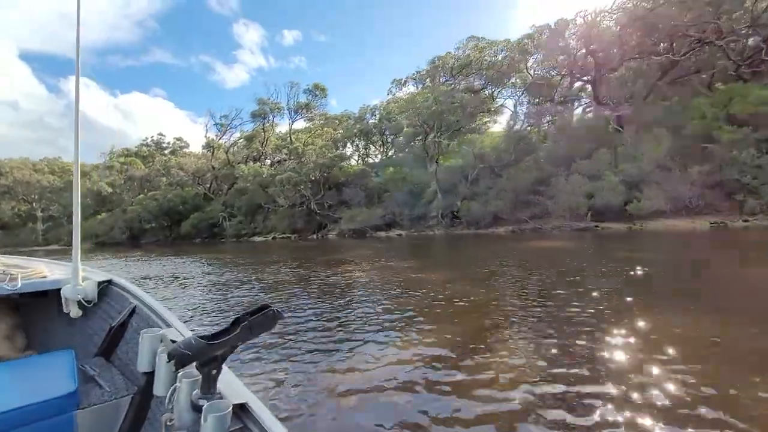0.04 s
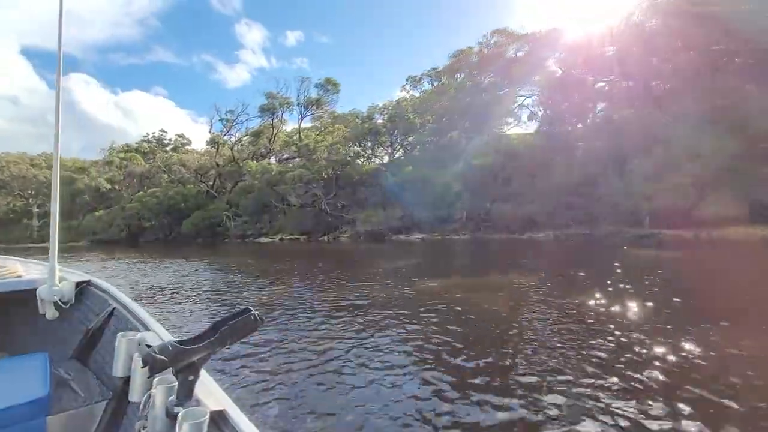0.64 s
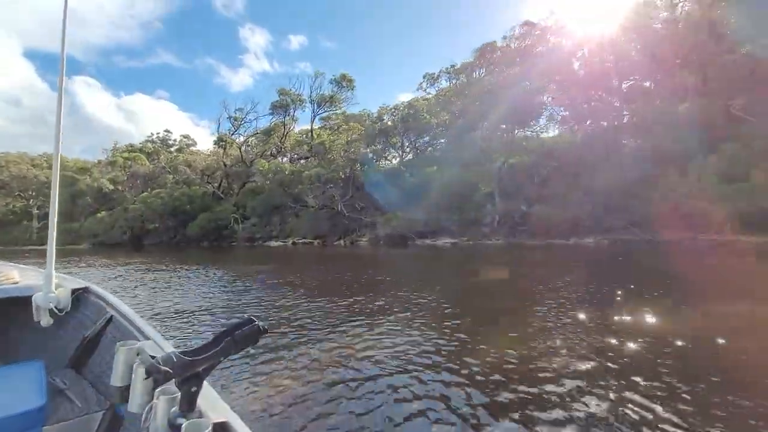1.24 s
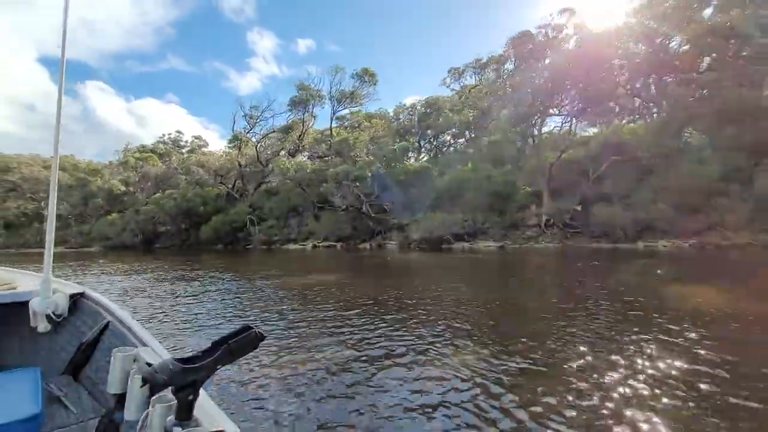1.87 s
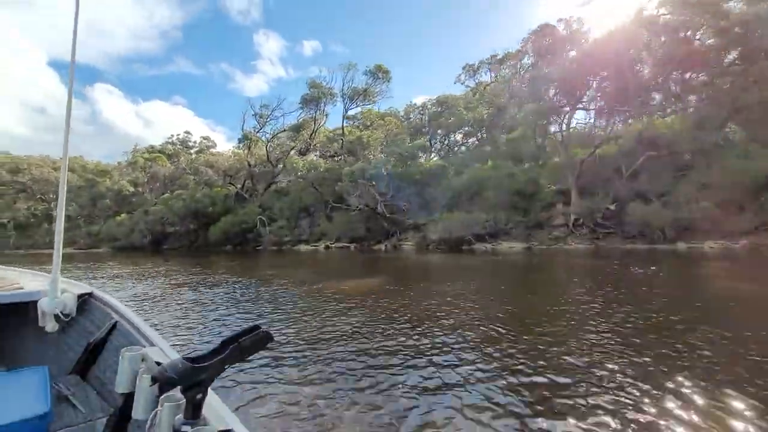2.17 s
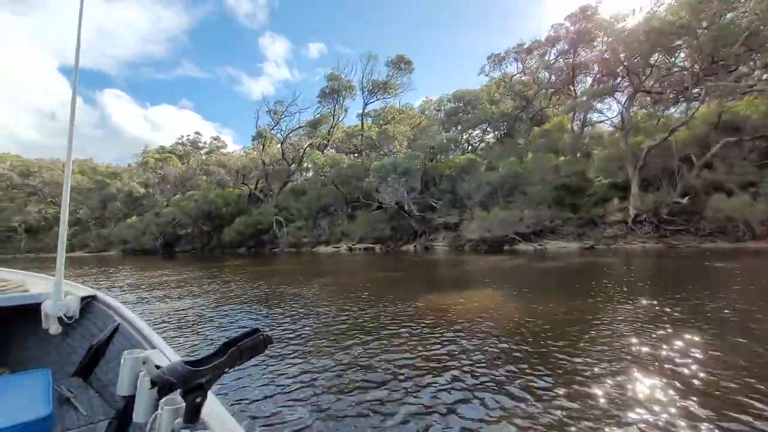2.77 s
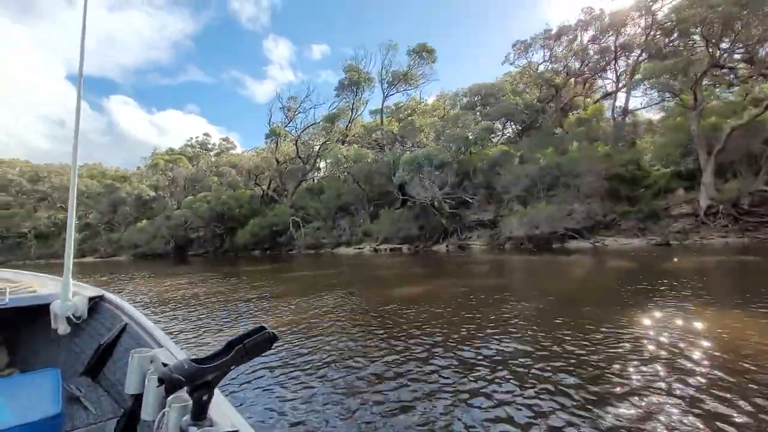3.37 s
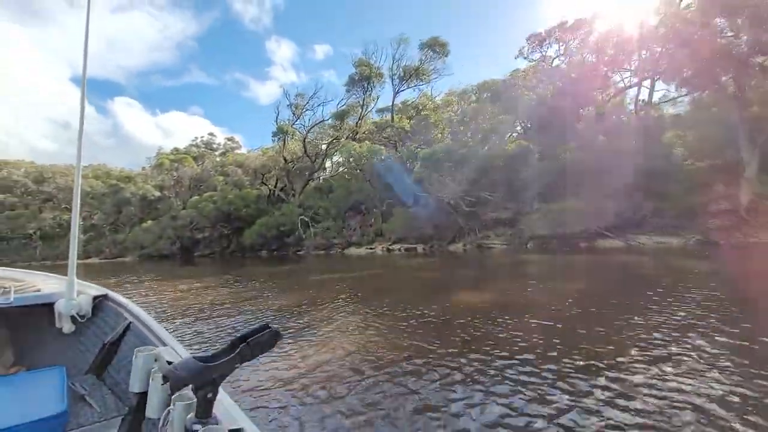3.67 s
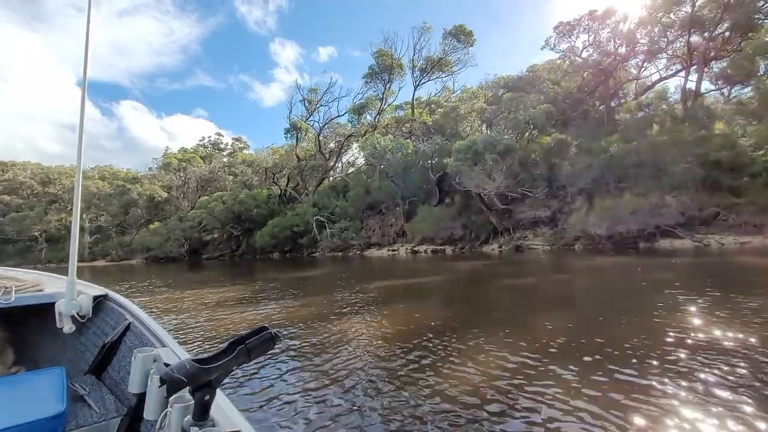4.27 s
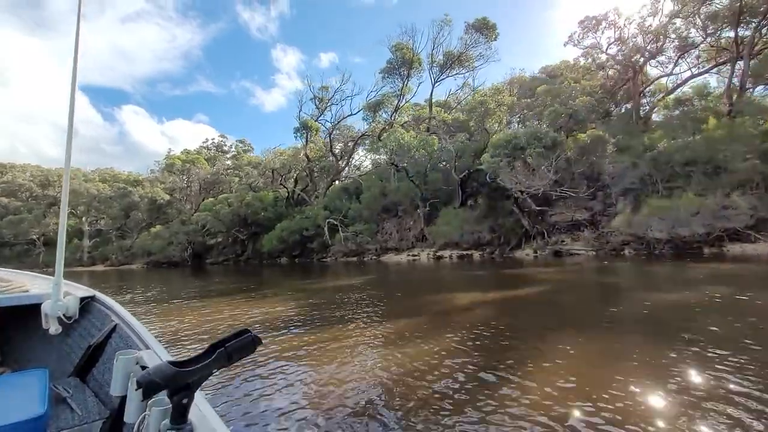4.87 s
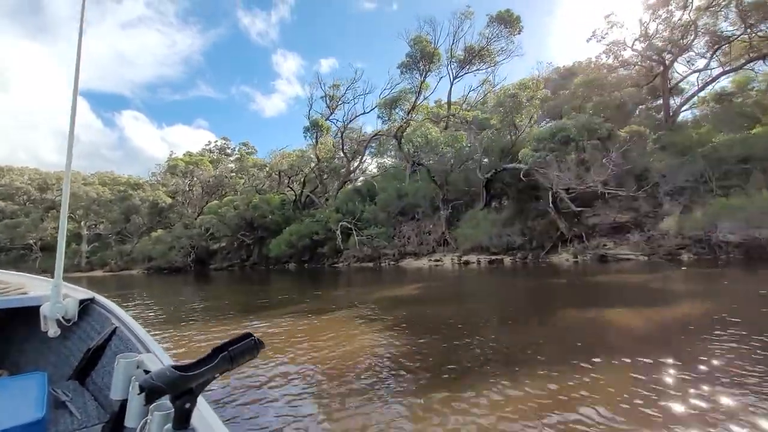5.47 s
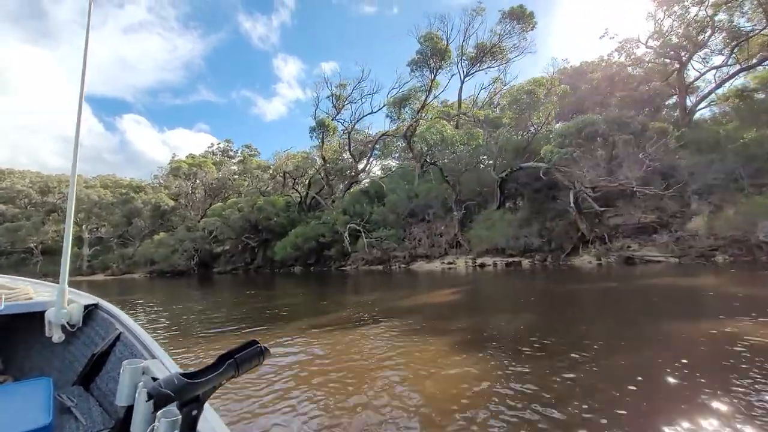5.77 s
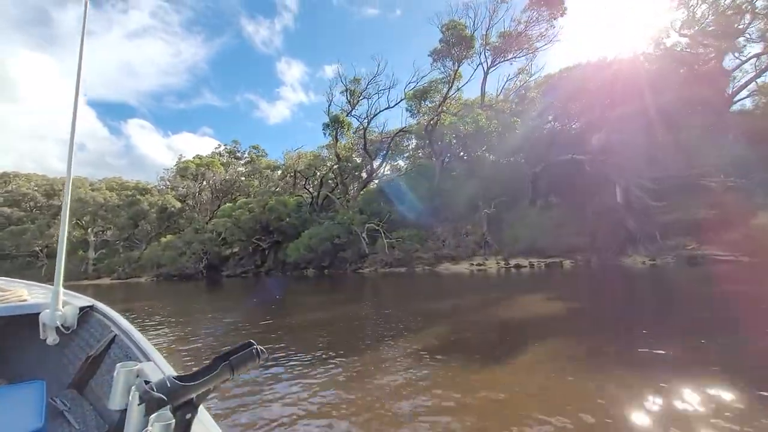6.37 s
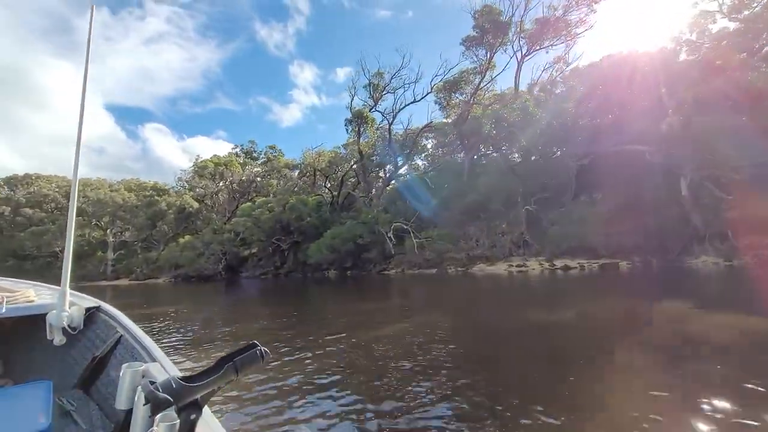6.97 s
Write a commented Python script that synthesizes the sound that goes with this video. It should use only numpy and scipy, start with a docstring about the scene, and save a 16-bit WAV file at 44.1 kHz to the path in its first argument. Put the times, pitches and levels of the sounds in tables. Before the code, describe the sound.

Gusty wind thumps the microphone over the hum and rattle of a small boat's outboard motor, which gradually eases off.

```python
"""A small outboard motor pushes a metal dinghy along a river, slowly easing off.
Its firing pulses boom in the hull and rattle the cowling, to the right, where a bearing whines too.
Water washes along the hull and the wake hisses. A head wind rumbles, gusts and thumps
on the microphone, mostly at its left port."""
import sys
import numpy as np
from scipy import signal
from scipy.fft import rfft, irfft, next_fast_len
from scipy.io import wavfile
from scipy.ndimage import uniform_filter1d

SR = 44100
rng = np.random.default_rng(int(sys.argv[2]) if len(sys.argv) > 2 else 0)


def generate_wav(sig):
    """Save sig (samples, or channels by samples) to the path in sys.argv[1] as 16-bit PCM at SR."""
    pcm = np.round(np.clip(np.atleast_2d(sig).T, -1, 1) * 32767).astype(np.int16)
    wavfile.write(sys.argv[1], SR, pcm)


N = 309582
TIME = np.arange(N) / SR


def amp(db):
    """Decibels to gain."""
    return 10 ** (np.asarray(db) / 20)


def unit(x):
    """Scales to rms 1."""
    return x / np.sqrt(np.mean(x ** 2) + 1e-20)


def levelled(x, size):
    """Holds the rms near 1 over spans of size samples."""
    return x / np.sqrt(abs(uniform_filter1d(uniform_filter1d(x ** 2, size), size)) + 1e-12)


def curves(rows):
    """A table's columns as automation lanes, with straight ramps."""
    times_s, *columns = np.transpose(rows)
    return [np.interp(TIME, times_s, column) for column in columns]


def filtered(x, gain):
    """Filters x by a gain that is a function of frequency."""
    size = next_fast_len(len(x))
    return irfft(rfft(x, size) * gain(np.fft.rfftfreq(size, 1 / SR) + 1e-3), size)[:len(x)]


def highpass(x, edge_hz):
    """The part of x above a soft edge."""
    return filtered(x, lambda f: 1 / (1 + (edge_hz / f) ** 4))


def noise(spectrum, channel):
    """Noise coloured by a spectrum's left (0) or right (1) column, in dB per Hz."""
    hz, *db = np.transpose(spectrum)
    white = rng.standard_normal(N) * np.sqrt(SR / 2)
    return filtered(white, lambda f: amp(np.interp(np.log(f), np.log(hz), db[channel])))


def wander(rate_hz):
    """Random drift of rms 1, rolling off above the rate."""
    return unit(filtered(rng.standard_normal(N), lambda f: np.exp(-(f / rate_hz) ** 2)))


def partial(angle):
    """A sine that follows the angle from a random starting phase."""
    return np.cos(angle + rng.uniform(0, 2 * np.pi))


# The throttle easing off: time_s, shaft_speed_hz
SHAFT_SPEED = [(0, 62.65), (.8, 62.4), (1.5, 61.8), (1.8, 61.15), (2.05, 60.2), (2.3, 58.85), (2.9, 56.95),
               (3.2, 56.8), (3.8, 55.5), (4.1, 56.05), (4.4, 55.5), (5.3, 55.15), (5.55, 54.75),
               (5.8, 53.4), (6.55, 52.35), (7.02, 52.8)]


def shaft(hunting=0.002106, jitter_rad=0.017):
    """Crank angle: the speed hunts a little and no two turns are alike."""
    speed_hz = curves(SHAFT_SPEED)[0] * (1 + hunting * wander(6.96))
    return 2 * np.pi * np.cumsum(speed_hz) / SR + jitter_rad * wander(37)


# The orders that shake the hull hardest: shaft_multiple
BOOMING_ORDERS = (2, 3, 4, 6)
# The hull's resonance; a booming order swells as it slides over a peak: pitch_hz, level_db
HULL_RESPONSE = [(104, -26), (111, -21.5), (113.5, -18), (118, -26), (125, -26), (158, -22), (166, -33),
                 (175, -41), (188, -29), (209, -32), (220, -19), (223, -25.5), (231, -20.5), (249, -39),
                 (316, -31.5), (331, -39.5), (345, -29), (360, -31), (376, -25.5)]
# The steadier orders, shifting as the shaft slows: shaft_multiple, level_db, growth_db_per_hz
STEADY_ORDERS = [(1, -36, -1), (5, -37.5, 0.26), (7, -41, 0.64), (8, -41.5, 1.88), (9, -53, 0.9),
                 (10, -56, -3), (12, -46.5, 0.76), (14, -49, -0.8), (15, -51, 1.4)]


def hull_drone(angle, sway_db=0.94, steady_trim_db=-1, waver_db=2.5, left_db=-0.1, left_lag_rad=0.045):
    """Firing pulses sound the hull at whole multiples of the shaft speed."""
    speed_hz, = curves(SHAFT_SPEED)
    slowing_hz = speed_hz.mean() - speed_hz
    hull_hz, hull_db = np.transpose(sorted(HULL_RESPONSE))
    booming = [(k, np.interp(k * speed_hz, hull_hz, hull_db) + sway_db * wander(4.4))
               for k in BOOMING_ORDERS]
    steady = [(k, db + steady_trim_db + growth * slowing_hz + waver_db * wander(1.9))
              for k, db, growth in STEADY_ORDERS]
    port_angle = angle - np.array([[left_lag_rad], [0]])
    drone = np.zeros((2, N))
    for k, db in booming + steady:
        # the firing orders peak together, once for each cylinder
        phase = 0 if k in (2, 4) else rng.uniform(0, 2 * np.pi)
        drone += amp(db + .7 * wander(9)) * np.sqrt(2) * np.cos(k * port_angle + phase)
    uneven_firing = 1 + .06 * wander(50)
    return drone * uneven_firing * amp([[left_db], [0]])


# The ring of the motor's cover: pitch_hz, width_hz, level_db
COWLING_MODES = [(790, 360, -9.5), (1195, 36, -2), (1348, 69, 4), (1501, 60, 3.5), (1896, 50, 2.5),
                 (2000, 69, -18), (2700, 410, -9.5)]


def cowling(drive):
    """The cover's panels ring as resonators of alternating polarity."""
    def response(f):
        return sum((-1) ** k * amp(db) / (1 + 1j * (f * f - hz * hz) / (f * width))
                   for k, (hz, width, db) in enumerate(COWLING_MODES))
    return unit(filtered(drive, response))


# The bearing's whine: ball_pass_multiple, level_db
WHINE_PARTIALS = [(7, -4), (8, 0), (11, -7)]


def bearing(angle, passes_per_turn=3.1, slip_rad=0.09):
    """Rolling balls pass and slip slightly: a whine between the motor's orders."""
    ball_angle = passes_per_turn * angle + slip_rad * wander(14)
    return unit(sum(amp(db + 2 * wander(11)) * partial(k * ball_angle) for k, db in WHINE_PARTIALS))


# How hard the rattle and the wake run: time_s, clatter_db (before the cowling's trim), wake_db (only its swings
# count)
CLATTER_AND_WAKE_LEVELS = [(0, -34, -42), (0.5, -33, -42), (1.05, -34.5, -43.5), (1.9, -34.5, -43.5),
                           (2.3, -33, -42), (2.9, -34.5, -42), (3.6, -33, -42.5), (4.3, -32.5, -42.5),
                           (5.1, -29, -40), (5.6, -30.5, -40.5), (6.0, -29, -41), (7.02, -29, -40)]


def clatter(angle, trim_db=4, knock_db=-1, whine_db=-6, left_db=-12, scatter_db=-9,
            left_lag_s=0.00022, bright_hz=2300):
    """Regular knocks and a puff of rattle at each firing ring the cowling; the bearing sings through."""
    # two cylinders: the even orders are the stronger
    knocks = unit(sum((.5 if k % 2 else 1) * partial(k * angle) for k in range(17, 42)))
    # two uneven puffs a turn
    stroke = np.exp(.47 * np.cos(2 * angle) + .16 * np.cos(angle) + .5 * np.tanh(wander(43)))
    rattle, scattered = (cowling(stroke * rng.standard_normal(N)) for _ in range(2))
    right = rattle + amp(knock_db) * cowling(knocks) + amp(whine_db) * bearing(angle)
    right = levelled(right, size=16000)
    left = amp(left_db) * np.interp(TIME - left_lag_s, TIME, right) + amp(scatter_db) * scattered
    force_db = curves(CLATTER_AND_WAKE_LEVELS)[0]
    top_gain = amp(force_db - force_db.mean() - 6)  # a harder rattle is also a brighter one
    ports = []
    for side in (left, right):
        softened = side - highpass(side, 2 * bright_hz)
        top = highpass(softened, bright_hz)
        ports.append(softened - top + top * top_gain)
    return np.array(ports) * amp(force_db + trim_db)


# The colour of wash and spray: frequency_hz, left_db_per_hz, right_db_per_hz
WAKE_SPECTRUM = [(100, -58.5, -48.5), (384, -66, -55), (590, -65, -64.5), (1010, -64, -63.5),
                 (1520, -72, -62), (2360, -75.5, -69), (3000, -79, -74), (4400, -78, -78),
                 (5970, -84.5, -78.5), (7370, -84.5, -81), (8560, -89, -92), (9650, -90, -82),
                 (11700, -88, -84.5), (14000, -89.5, -94.5), (15800, -88, -94)]


def wake(left_follow=1, right_follow=2, fizz_db=0.96, lapping_db=0.33, split_hz=2500):
    """Water washes along the hull and breaks into fine spray, which swells mostly on the right."""
    ride_db = curves(CLATTER_AND_WAKE_LEVELS)[1]
    swell_db = ride_db - ride_db.mean()
    splash_db = .4 * wander(7)
    ports = []
    for channel, follow in enumerate((left_follow, right_follow)):
        water = noise(WAKE_SPECTRUM, channel)
        top = highpass(water, split_hz)
        wash = (water - top) * amp(.5 * follow * swell_db + lapping_db * wander(20))
        spray = top * amp(follow * swell_db + splash_db + fizz_db * wander(190))
        ports.append(wash + spray)
    return np.array(ports)


# The bed of head wind between gusts: time_s, level_db
BREEZE_RIDE = [(0, -20), (.8, -13.5), (1.05, -18.5), (2.9, -19), (3.5, -18), (4.2, -25.5), (4.7, -27),
               (5.0, -21.5), (5.6, -27.5), (6.35, -33), (6.65, -23), (7.02, -20.5)]
# Single gusts and the port each hits: peak_s, length_s, level_db, side
GUST_CUES = [(0.185, 0.25, -14, "left"), (0.357, 0.26, -17.5, "left"), (.45, 0.11, -18, "right"),
             (0.716, 0.16, -16.5, "left"), (0.99, 0.053, -21, "right"), (1.065, 0.039, -11.5, "left"),
             (1.284, 0.041, -15.5, "left"), (1.397, 0.057, -12, "left"), (1.754, 0.071, -14, "left"),
             (1.949, 0.052, -10, "left"), (2.142, 0.046, -15, "left"), (2.267, 0.085, -17, "left"),
             (2.41, 0.04, -15, "left"), (2.665, 0.083, -15.5, "left"), (2.805, 0.16, -12.5, "left"),
             (2.994, .09, -25, "right"), (3.066, 0.036, -11.5, "left"), (3.23, 0.053, -35, "right"),
             (3.274, 0.023, -12, "left"), (3.679, 0.033, -12.5, "left"), (3.7, .06, -23, "right"),
             (3.987, 0.04, -18, "left"), (4.096, 0.037, -14, "left"), (4.36, 0.048, -14, "left"),
             (4.882, 0.076, -16.5, "left"), (5.063, 0.11, -16, "left"), (5.296, 0.037, -7.5, "left"),
             (5.406, 0.063, -12.5, "left"), (5.763, 0.03, -8.5, "left"), (6.028, 0.12, -13.5, "left"),
             (6.592, 0.1, -13, "left"), (6.721, 0.031, -13, "left"), (6.93, 0.037, -14.5, "left")]


def gusting(port, follow, shelter_db, restless_db, spill_db):
    """Wind strength in dB at a port: a restless breeze plus gusts, which spill over from the far side."""
    breeze_db, = curves(BREEZE_RIDE)
    bed_db = breeze_db.mean() + follow * (breeze_db - breeze_db.mean()) + shelter_db
    power = amp(bed_db + restless_db * wander(26)) ** 2
    for peak_s, length_s, db, side in GUST_CUES:
        bell = .5 ** np.minimum((2 * (TIME - peak_s) / length_s) ** 2, 20)
        power += amp(db + (0 if side == port else spill_db)) ** 2 * bell
    return 10 * np.log10(power)


# The wind's tone, each side a shape only: frequency_hz, left_db, right_db
RUMBLE_SPECTRUM = [(15, -27, -32), (28.2, -37, -25), (49, 0, 18), (70, -0.5, 1), (135, -2, 2.5),
                   (197, -9, 1.5), (236, -1.5, 5), (320, -8, -13), (498, -16.5, -25.5), (920, -30.5, -41),
                   (4000, -66, -70)]


def wind(strength_db, channel, trim_db, deepen, deep_hz=90, split_hz=400, low_cut_hz=27,
         eddy_db=3, tearing_db=2.5, brighten=0.11):
    """Turbulence at one port: a lumpy rumble; gusts thump deeper, a stiff breeze tears at the top."""
    surge_db = np.minimum(strength_db - strength_db.mean(), 2)
    eddies = np.tanh(wander(26))
    rumble = unit(noise(RUMBLE_SPECTRUM, channel))
    above_deep, top = highpass(rumble, deep_hz), highpass(rumble, split_hz)
    thump = (rumble - above_deep) * amp(deepen * surge_db + 2 * np.tanh(wander(15)))
    middle = above_deep - top
    body = middle.std() * levelled(middle, size=2600)
    breeze_db, = curves(BREEZE_RIDE)
    tearing = top * amp(brighten * (breeze_db - breeze_db.mean()) + tearing_db * eddies)
    gain = amp(strength_db + trim_db + eddy_db * eddies)
    return highpass((thump + body + tearing) * gain, low_cut_hz)


# Sharp eddies on the left port, before scaling: peak_s, level_db, brightness_hz, decay_s
BUFFET_CUES = [(.144, -11.5, 570, 0.01), (.211, -7.5, 640, .004), (.396, -10, 560, 0.0041),
               (.491, -13, 800, 0.0099), (.629, -15.5, 700, 0.022), (.653, -9.5, 590, 0.018),
               (.762, -14.5, 780, .017), (.825, -9, 734, 0.0048), (.889, -13.5, 600, .007),
               (.909, -11.5, 480, 0.0065), (.946, -10.5, 900, 0.0097), (1.05, -14.5, 640, 0.014),
               (1.259, -13, 604, 0.007), (1.371, -18, 1000, 0.011), (1.494, -11.5, 570, 0.0022),
               (1.568, -10, 860, 0.007), (1.747, -14, 810, 0.012), (1.947, -10.5, 594, 0.01),
               (2.147, -10, 860, 0.0036), (2.411, -13, 560, .011), (2.661, -15.5, 600, 0.044),
               (2.687, -13.5, 606, .012), (2.756, -10.5, 475, 0.018), (2.936, -8.5, 464, 0.0083),
               (3.076, -13, 457, .014), (3.196, -8.5, 760, 0.0039), (3.67, -10, 434, 0.021),
               (3.783, -13, 695, 0.0025), (3.954, -15.5, 580, 0.0031), (4.885, -8.5, 590, 0.0044)]


def buffets(decay_scale=0.79, brightness_scale=0.98, rise_s=0.003, snap_db=-3,
            low_hz=190, top_hz=2500, right_db=-22):
    """Each sharp eddy is a sudden ragged puff; the shortest are mostly one quick swing of pressure."""
    track, t = np.zeros(N), np.arange(4096) / SR
    shortest_s = min(row[3] for row in BUFFET_CUES)
    for peak_s, db, brightness_hz, decay_s in BUFFET_CUES:
        edge_hz = brightness_scale * brightness_hz

        def band(f):
            low_cut = 1 / (1 + low_hz / (1j * f)) ** 2
            return low_cut / (1 + (f / edge_hz) ** 2.3) / (1 + (f / top_hz) ** 6)
        puff = unit(filtered(rng.standard_normal(len(t)), band))
        puff *= np.minimum(t / rise_s, np.exp((rise_s - t) / (decay_scale * decay_s)))
        from_peak = np.pi * edge_hz * (t - rise_s)
        swing = rng.choice([-1, 1]) * from_peak / (1 + from_peak ** 2) ** 2
        swing /= np.sqrt(uniform_filter1d(swing ** 2, size=200).max())
        snap = amp(snap_db) * shortest_s / decay_s * swing
        start = round((peak_s - rise_s) * SR)
        track[start:start + len(t)] += amp(db) * (puff + snap)
    return track * amp([[0], [right_db]])


def scene():
    """Motor, water and wind at the two ports."""
    angle = shaft()
    left_db = gusting("left", follow=0.99, shelter_db=0, restless_db=2, spill_db=-13)
    left_wind = wind(left_db, channel=0, trim_db=0.37, deepen=0.43)
    right_db = gusting("right", follow=0.3, shelter_db=-8, restless_db=1.5, spill_db=-26)
    right_wind = wind(right_db, channel=1, trim_db=0.7, deepen=0.71)
    return hull_drone(angle) + clatter(angle) + wake() + np.array([left_wind, right_wind]) + buffets()


def record(dry):
    """A soft clip rounds the strongest gusts at full scale; a steep high cut follows."""
    rounded = dry / (1 + dry ** 8) ** (1 / 8)
    high_cut = signal.firwin(511, cutoff=15850, window=("kaiser", 9), fs=SR)
    return signal.oaconvolve(rounded, high_cut[None], "same")


dry = scene()
out = record(dry)
generate_wav(out)
```